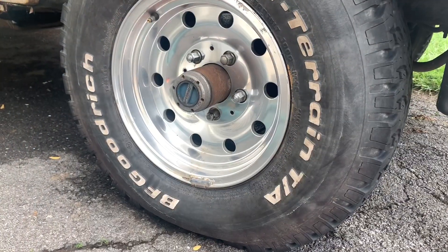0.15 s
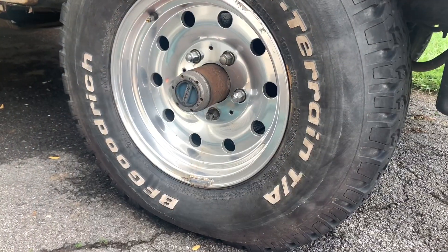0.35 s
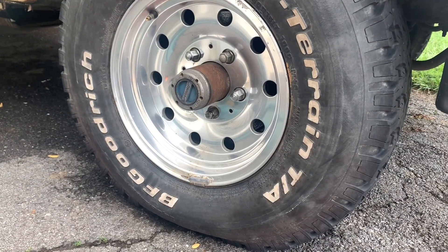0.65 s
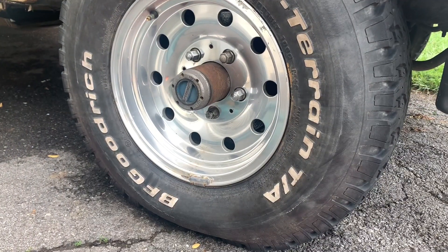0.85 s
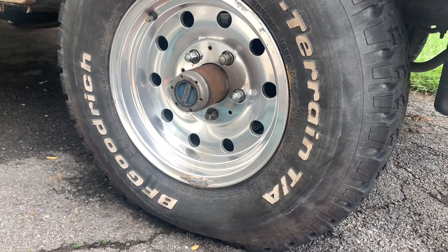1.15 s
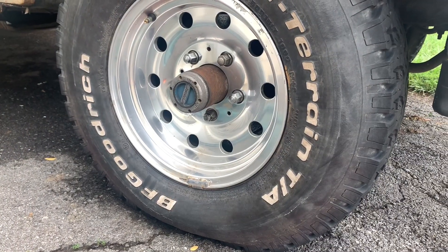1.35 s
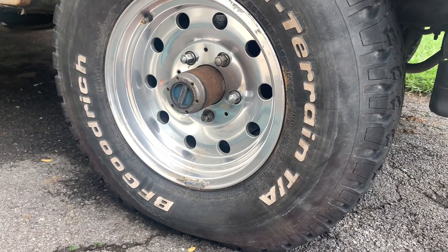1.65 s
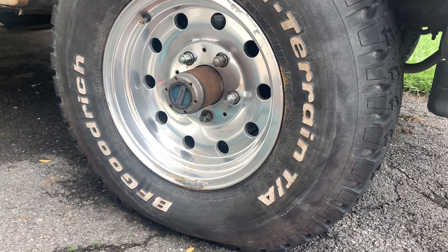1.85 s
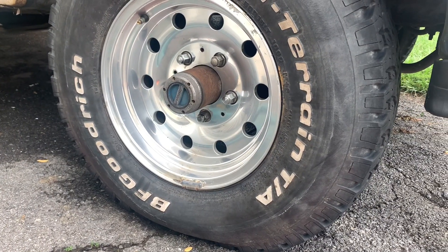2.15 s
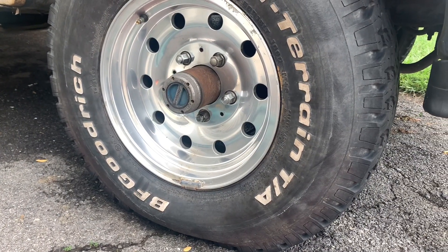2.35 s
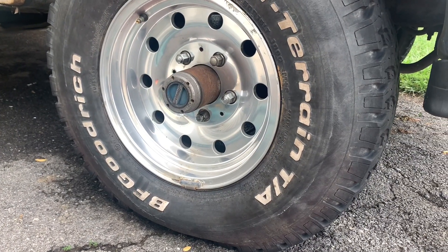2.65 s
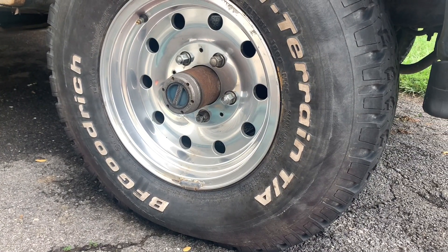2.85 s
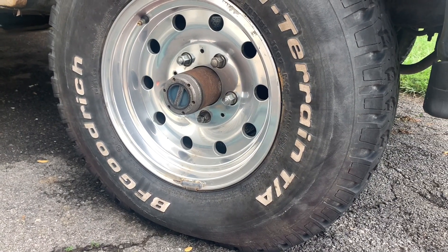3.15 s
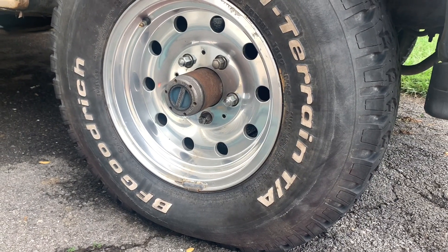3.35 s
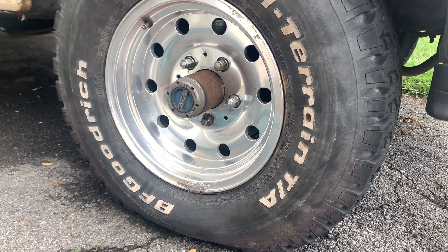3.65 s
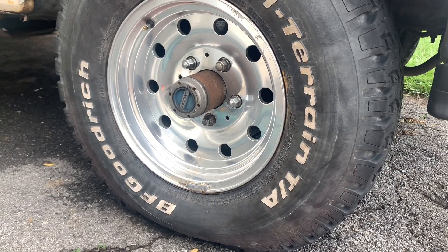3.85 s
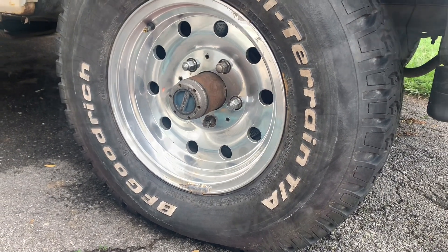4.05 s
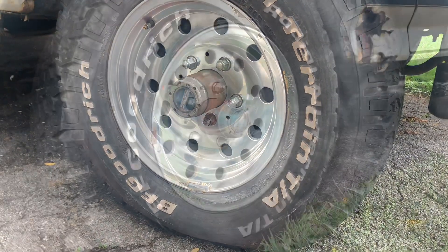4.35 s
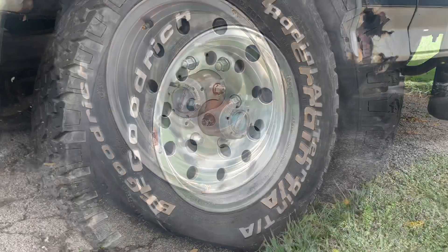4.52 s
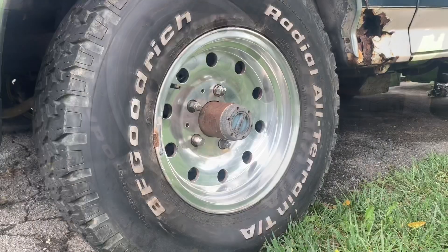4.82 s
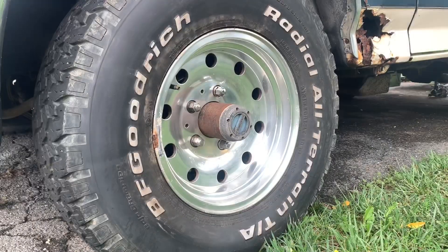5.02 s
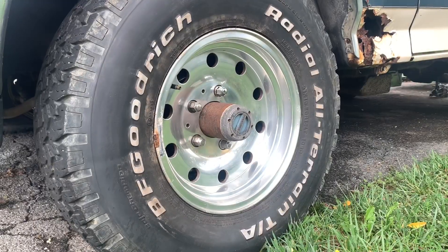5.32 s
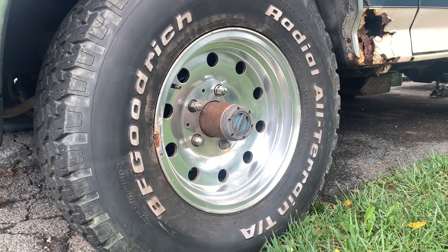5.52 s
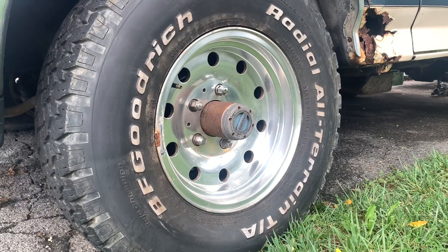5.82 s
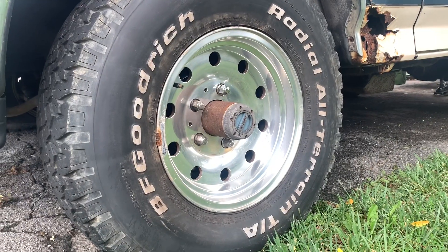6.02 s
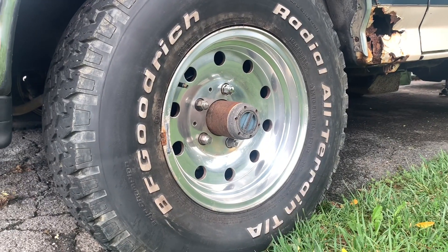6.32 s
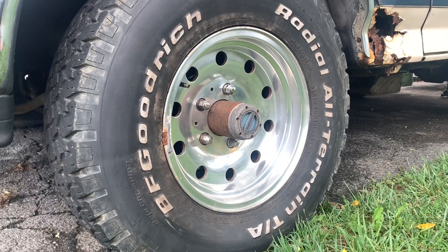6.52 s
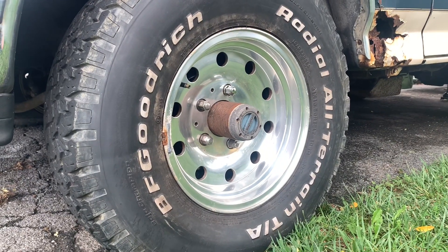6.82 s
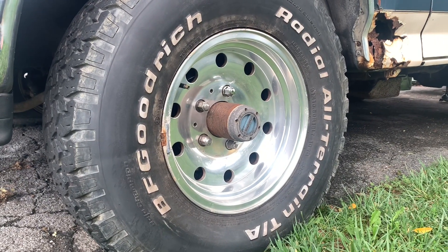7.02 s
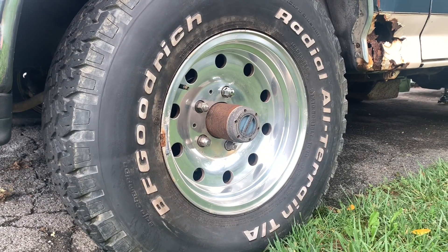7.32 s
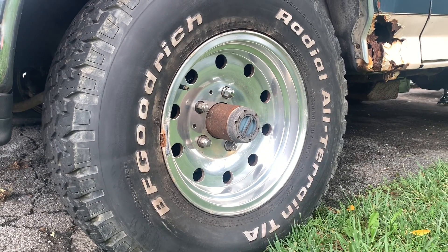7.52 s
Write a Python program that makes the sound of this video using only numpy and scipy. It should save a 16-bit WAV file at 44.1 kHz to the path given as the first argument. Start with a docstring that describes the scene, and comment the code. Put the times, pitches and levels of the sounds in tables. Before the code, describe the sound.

Close stereo microphone in a driveway: air rushes from a truck tire valve, its shrill whistle wavering at first, then settling slightly lower and holding steady with bright overtones. Around four seconds it slips and fades across into a second tire's wider, mostly toneless hiss, briefly tinged by a breathy tone. Faint low traffic rumble and small handling knocks sit underneath.

```python
"""A driveway, close to the valve stems of two truck tires: air hisses out of the first, then the second.
The first jet is shaped noise; its whistle is a stack of partials that lock to the stem as the flow settles.
The second is a wide rush of noise with a breathy, fading tone made of two narrow noise bands.
Low outdoor rumble is filtered noise, joined by a distant machine's hum beside the second tire.
Soft knocks on the hand-held stereo microphone are short sine pops with a tick of noise."""
import sys
import numpy as np
from scipy import signal
from scipy.fft import rfft, irfft
from scipy.io import wavfile

SR = 44100
rng = np.random.default_rng(int(sys.argv[2]) if len(sys.argv) > 2 else 0)


def unload_audio(sound):
    """Save the sound as a 16-bit wav file, at the path given as the first command line argument."""
    columns = np.transpose(np.atleast_2d(sound))
    # keep every value between -1 and 1, then stretch to whole-number steps
    steps = np.round(np.clip(columns, -1, 1) * 32767)
    wavfile.write(sys.argv[1], SR, steps.astype(np.int16))


N = 338461
EDGE_HZ = 15750  # upper edge of the recorder's band
TIME = np.arange(N) / SR
BINS = np.fft.rfftfreq(N, 1 / SR)

# Stem resonances that the partials glide through and the first jet also blows.
# Each row: centre in Hz, width in Hz, boost of a partial in dB,
# breath in dB before the whistle settles, breath in dB after.
STEM = [(4680, 33, 7.5, -41.5, -60), (6790, 127, 10, -42.5, -62), (8880, 113, 8, -43, -37),
        (10970, 450, 0, -60, -44)]
# How loosely the whistle is locked to the stem; it catches, stumbles, holds, then slips.
# Each row: time in seconds, looseness from 0 to 1.
LOOSENESS = [(.37, 1), (.41, 0.43), (.48, .45), (.51, 0.83), (.55, 0.32), (.62, 0.4), (.72, 0.27),
             (.86, 0.16), (1.05, 0.16), (1.3, 0.1), (1.6, 0), (3.75, 0.02), (4.05, 0.17), (4.1, 0.67),
             (4.18, 0.38), (4.4, 0.92)]
# The first jet's stereo image below the treble.
# Each row: frequency in Hz, radians by which left leads, coherence from 0 to 1, left-right in dB.
FIRST_PORTS = [(600, -1, 0.97, -0.5), (1000, 1.15, 0.7, 1), (1600, -0.05, 0.87, 0.5), (2220, 2.5, 0.47, -5),
               (2420, 3.5, 1, -4), (2927, 3, 1, -1.5), (3004, -1, 0.47, 2), (3900, 0.3, 0.33, -1),
               (4600, -1, 0.49, -5), (4870, -3.5, 0.73, -5.5), (5500, -4, 0.38, -3.5), (5760, -4.5, .1, -2),
               (5900, -6, 0.72, -4), (6700, -5, 0.39, -2), (7270, -7.8, 0.58, -1)]


def gain_of(db):
    """Decibels to amplitude."""
    return 10 ** (np.asarray(db) / 20)


def evened(x):
    """Scales to rms 1."""
    return x / np.sqrt(np.mean(np.abs(x) ** 2) + 1e-30)


def curves(rows):
    """Each column of a timed table, sample by sample."""
    s, *columns = np.transpose(rows)
    return [np.interp(TIME, s, column) for column in columns]


def spectra(rows):
    """Each column of a frequency table, bin by bin along a log frequency scale."""
    hz, *columns = np.transpose(rows)
    return [np.interp(np.log(BINS + 1), np.log(hz), column) for column in columns]


def bumps(rows, hz):
    """The dB that a set of peaks and dips gives at these frequencies."""
    return sum(db / (1 + ((hz - centre) / width) ** 2) for centre, width, db in rows)


def ramp(start_s, end_s):
    """Rises evenly from 0 to 1 between two times."""
    return np.clip((TIME - start_s) / (end_s - start_s), 0, 1)


def blend(a, b, share):
    """Equal-power passage from one sound to another."""
    return np.sqrt(1 - share) * a + np.sqrt(share) * b


def white():
    """A spectrum of white noise."""
    return rfft(rng.standard_normal(N))


def wander(rate_hz):
    """Random drift of rms 1, up to about the given rate."""
    return evened(irfft(white() / np.sqrt(1 + (BINS / rate_hz) ** 4), N))


def fuzz(width_hz):
    """The complex envelope of a narrow band of noise."""
    return evened(wander(width_hz) + 1j * wander(width_hz))


def carrier(hz):
    """A steady complex tone."""
    return np.exp(2j * np.pi * hz * TIME)


def at_ports(tone, balance_db, lead):
    """A complex tone as the two microphone ports hear it, tilted in level and in phase."""
    tilt = gain_of(balance_db / 2) * np.exp(.5j * lead)
    return np.array([tone * tilt, tone / tilt]).real * np.sqrt(2)


def noise_pair(colour_db, lead, coherence, balance_db):
    """Coloured noise of rms 1, partly shared by the two ports."""
    same, left = np.clip(coherence, 0, 1), white()
    shared = same * left * np.exp(-1j * lead)
    right = shared + np.sqrt(1 - same ** 2) * white()
    tilt = gain_of(balance_db / 2)
    pair = np.array([left * tilt, right / tilt])
    return evened(irfft(pair * gain_of(colour_db), N))


def stereo_image(rows):
    """Stereo phase, coherence and balance, bin by bin; one shared stereo image for the treble."""
    # Each row: frequency in Hz, radians by which left leads, coherence from 0 to 1, left-right in dB.
    treble_image = [(7450, -1.5, 0.67, 0), (8073, -3, 1, 0), (8885, -3, 1, 0), (9810, -5, 0.49, 0),
                    (10280, -6, 0.81, 0), (11700, -6, 0.92, 0), (12150, -7.7, .55, 0),
                    (12980, -9.4, .99, 0), (14100, -9.4, .98, 0), (14680, -11, .55, 0),
                    (15300, -12.5, 0.89, 0)]
    return np.where(BINS < treble_image[0][0], spectra(rows), spectra(treble_image))


def outdoors(first_db, second_db, wide_db, hum_db):
    """Far traffic as low noise, stronger beside the second tire, where a wavering hum joins it."""
    # Rumble before trim. Each row: time in seconds, level in dB.
    rumble_level = [(0, -52.5), (1.4, -49), (2.5, -54), (4.1, -56.5), (4.9, -48), (6.9, -48.5),
                    (7.67, -47.5)]
    # Rumble colour at each tire. Each row: frequency in Hz, relative density in dB per Hz.
    first_rumble = [(22, -12), (32, -23), (44, -4.5), (58, 0), (80, 0), (110, 1.5), (135, -2.5),
                    (165, -14.5), (200, -13.5), (260, -19.5), (350, -31.5), (560, -42), (760, -32),
                    (1000, -43), (1500, -54)]
    second_rumble = [(22, -28), (32, -26), (46, -3), (56, 1.5), (78, -4.5), (115, -0.5), (150, -6.5),
                     (200, -13.5), (310, -23.5), (360, -30), (490, -31), (600, -66), (1500, -67)]
    # The late spread between the ports.
    # Each row: frequency in Hz, radians by which left leads, coherence from 0 to 1, left-right in dB.
    wide_ports = [(50, .1, .99, 1), (100, 0.32, 1, 2), (160, 0.68, 0.81, 1), (220, 3.1, 1, 0),
                  (290, 2.8, 0.92, -1), (450, .3, 0.63, 0)]
    # A distant machine. Each row: frequency in Hz, level in dB before trim,
    # radians by which left leads once the rumble has spread.
    hum_rows = [(54.4, -56, .1), (103, -57, 0.54), (202.7, -66.5, 2.65), (303, -74.5, 3.1)]

    moved, spread = ramp(4.1, 4.9), ramp(5.7, 6.2)
    first = noise_pair(*spectra(first_rumble), lead=-0.079, coherence=0.97, balance_db=0.36)
    second = noise_pair(*spectra(second_rumble), lead=0, coherence=1.0, balance_db=.2)
    wide = noise_pair(*spectra(second_rumble), *spectra(wide_ports))
    beside_second = blend(gain_of(second_db) * second, gain_of(wide_db) * wide, spread)
    rumble = blend(gain_of(first_db) * first, beside_second, moved) * gain_of(curves(rumble_level)[0])

    hum = np.zeros((2, N))
    for hz, db, lead in hum_rows:
        waver = np.exp(0.99j * wander(1.7))  # slow drift of phase
        hum += at_ports(gain_of(db) * carrier(hz) * waver, 0, lead * spread)
    return rumble + gain_of(hum_db) * moved * hum


def flutter(x, depth_db, rate_hz, count=7):
    """Eddies make neighbouring bands of a jet swell and sag on their own."""
    place, spectrum = BINS / EDGE_HZ * (count - 1), rfft(x)
    out = np.zeros_like(x)
    for k in range(count):
        band = irfft(spectrum * np.maximum(1 - abs(place - k), 0), N)  # overlapping triangles
        out += band * gain_of(depth_db * wander(rate_hz))
    return evened(out)


def jet(flow, colour_db, image, level_db, flutter_db, surge_db):
    """Turbulent air leaving a valve stem: coloured noise with fluttering bands and slow surges."""
    hiss = flutter(noise_pair(colour_db, *image), flutter_db, rate_hz=14.0)
    return hiss * gain_of(level_db + curves(flow)[0] + surge_db * wander(3.9))


def first_jet():
    """The first valve's hiss, with uneven peaks and dips across its band."""
    # Hiss before trim. Each row: time in seconds, level in dB.
    flow = [(0, -28.5), (0.4, -26.5), (1, -25.5), (1.5, -24), (2.1, -26), (3.9, -27)]
    # Jet colour. Each row: frequency in Hz, relative density in dB per Hz.
    colour = [(450, -100), (900, -95.5), (1400, -87), (1750, -89), (2080, -69), (2300, -66.5), (2480, -111),
              (2800, -80), (4300, -76.5), (5700, -77), (6200, -69.5), (7700, -65.5), (10000, -69),
              (11200, -65), (12800, -68), (14200, -68), (15200, -63), (15700, -66)]
    # Peaks and dips. Each row: centre in Hz, width in Hz, peak or dip in dB.
    ripple = [(3196, 47, -9), (3490, 104, -8), (3990, 51, -4.5), (4980, 90, -3.5), (5320, 120, 2),
              (5680, 80, -2.5), (7000, 90, -11), (9530, 130, 3), (9900, 83, -1), (10600, 99, -2.5),
              (11400, 130, 4), (11630, 100, -3.5), (12330, 115, 7), (14270, 110, -6)]
    colour_db = spectra(colour)[0] + bumps(ripple, BINS)
    image = stereo_image(FIRST_PORTS)
    return jet(flow, colour_db, image, level_db=-1.0, flutter_db=0.86, surge_db=0.25)


def unsettled():
    """Looseness of the first jet's lock, ramped away as it settles on the stem's resonance."""
    return curves(LOOSENESS)[0] * (1 - ramp(0.7, 1.1))


def stem_breath():
    """The first jet blows each stem resonance as a narrow band of noise."""
    out, early = np.zeros((2, N)), unsettled()
    lead, _, balance_db = stereo_image(FIRST_PORTS)
    for hz, width, _, early_db, late_db in STEM:
        level_db = late_db + (early_db - late_db) * early
        tone = gain_of(level_db) * fuzz(width) * carrier(hz)
        out += at_ports(tone, np.interp(hz, BINS, balance_db), np.interp(hz, BINS, lead))
    return out


def whistle(shimmer_db, loose_shimmer_db, halo_hz, halo_growth, halo_sag_hz):
    """Vortices at the valve mouth lock to the stem: the firmer the lock, the louder and steadier the tone."""
    # The first valve's pitch. Each row: time in seconds, fundamental in Hz.
    pitch_rows = [(0.0, 2315), (0.35, 2320), (0.43, 2285), (0.52, 2310), (0.58, 2270), (0.65, 2297),
                  (0.78, 2262), (0.95, 2214), (1.25, 2184), (1.5, 2174), (1.72, 2187), (1.9, 2161),
                  (2.06, 2152), (2.18, 2175), (2.53, 2163), (2.68, 2182), (2.78, 2172), (3.1, 2178),
                  (3.42, 2191), (3.9, 2185), (4.3, 2137)]
    # Overtones firm up, thin out, then drop as the lock slips. Each row: time in seconds, strength in dB.
    overtone_rows = [(.35, -5.5), (.7, -6), (1.05, -1), (1.5, 0), (3.35, 0), (3.95, -3), (4.06, -5),
                     (4.14, -14), (4.45, -16)]
    # Partials from the fundamental up. Each row: relative level in dB,
    # change in dB per second as the pressure falls.
    partials = [(-1.08, 0), (-6.5, -1), (-8.5, -3), (-9.5, -1), (-4.5, -2.5), (-9, -0.9), (-13, -0.3)]
    # The same partials at the drifting microphone. Each row: left-right in dB, its drift in dB per second,
    # radians by which left leads, its drift in radians per second.
    partial_ports = [(-3.6, -0.3, 0, 0), (-7, 1.6, -1.7, 0.36), (-2, .4, -0.2, -0.33), (0, 0, 2.4, 0.11),
                     (0, 0, 0, 0), (0, 0, 3.14, 0), (0, 0, 0, 0)]
    # As pitch and hand move, reflections turn the fundamental between the ports.
    # Each row: time in seconds, added radians by which left leads, lean to the left in dB.
    turn_rows = [(.3, 1.78, 0), (.85, 1.78, 3.5), (.94, 2.55, 3), (1.2, 2.85, .5), (1.5, 2.62, 0),
                 (1.72, 2.85, 0), (1.85, 2.5, 0), (2.15, 2.63, 0), (2.5, 2.48, -.5), (3.15, 2.85, 0),
                 (3.35, 3.17, .5), (4.1, 3, 0)]
    locked_db, loose_db = -23.5, -16.5  # level when locked, change when fully loose
    breath_locked, breath_loose = .011, .72  # breathy power share when locked, and what looseness adds
    overtone_breath = 1.0  # how fast looseness blurs each higher partial
    jitter_hz, sway_hz, loose_sway_hz = 7.2, 2.4, 11  # Hz rms: fast, slower, added when fully loose

    loose = np.clip(curves(LOOSENESS)[0], 0, 1)
    overtones_db, pitch = curves(overtone_rows)[0], curves(pitch_rows)[0]
    turn, lean_db = curves(turn_rows)
    hz = pitch + (sway_hz + loose_sway_hz * np.sqrt(loose)) * wander(19.8)
    angle = 2 * np.pi * np.cumsum(hz + jitter_hz * wander(84.0)) / SR
    sag = carrier(-halo_sag_hz)  # the noisy halo sits a little under the tone
    boosts = [row[:3] for row in STEM]

    out = np.zeros((2, N))
    for k, (strength, placing) in enumerate(zip(partials, partial_ports), 1):
        db, sag_db = strength
        balance_db, balance_drift, lead, lead_drift = placing
        # high partials lock less firmly
        breathy = breath_locked + breath_loose * loose ** 1.5
        breathy = breathy + (k - 1) * overtone_breath * loose + halo_growth * (k - 1) ** 2
        breathy = np.clip(breathy, 0, 1)
        halo = fuzz(halo_hz * np.sqrt(k)) * sag
        envelope = np.sqrt(1 - breathy) + np.sqrt(breathy) * halo
        level_db = db + sag_db * TIME + (k > 1) * overtones_db + bumps(boosts, k * hz)
        tone = gain_of(level_db) * envelope * np.exp(1j * k * angle)
        balance = balance_db + balance_drift * TIME + (k == 1) * lean_db
        out += at_ports(tone, balance, lead + lead_drift * TIME + (k == 1) * turn)
    shimmer = (shimmer_db + loose_shimmer_db * loose) * wander(29)
    return out * gain_of(locked_db + loose_db * loose + shimmer)


def knocks(tick_s, tick_hz):
    """Each knock is a brief scuff of contact and a dull pop of a few cycles that reaches one port first."""
    # Each row: start in seconds, pop level in dB, pitch in Hz, length in seconds,
    # lag of the right side in seconds, peak of the contact tick in dB.
    knock_rows = [(.1426, -53.5, 450, .005, -.0002, -58), (1.2772, -42, 570, .004, -.0002, -43),
                  (1.908, -52, 510, .0045, -.0002, -55), (2.6572, -51.5, 520, .0045, -.0002, -52),
                  (3.1593, -51, 520, .0042, -.0002, -46), (3.9498, -51, 470, .005, -.0002, -56),
                  (4.1998, -49.5, 520, .0065, -.0002, -58), (5.651, -30.5, 460, .006, .0025, -42),
                  (5.9278, -46, 680, .003, -.0002, -36.5)]
    out, t = np.zeros((2, N)), np.arange(SR // 10) / SR
    band = signal.butter(2, [tick_hz / 2, tick_hz * 2], "band", fs=SR, output="sos")
    for s, db, hz, length, lag, tick_db in knock_rows:
        scuff = (t / tick_s) ** 2 * np.exp(-t / tick_s) * rng.standard_normal(len(t))
        tick = signal.sosfilt(band, scuff)
        tick = tick / abs(tick).max()
        age = np.clip(t - np.maximum([[-lag], [lag]], 0), 0, length)  # one row for each port
        pop = np.sin(np.pi * age / length) * np.sin(2 * np.pi * hz * age)
        out[:, round(s * SR):][:, :len(t)] += gain_of(db) * pop + gain_of(tick_db) * tick
    return out


def second_jet():
    """The second valve's wide rush, with uneven peaks and dips across its band."""
    # Each row: time in seconds, level in dB.
    flow = [(4.9, -24.5), (6.7, -23.5), (7.67, -24)]
    # Jet colour. Each row: frequency in Hz, relative density in dB per Hz.
    colour = [(600, -94), (780, -89), (1000, -88), (1400, -84.5), (1600, -76), (2050, -72.5), (2700, -68),
              (3000, -74.5), (3400, -77), (3750, -73.5), (4700, -77.5), (5500, -71), (7700, -67.5),
              (9300, -63.5), (11200, -65), (13300, -61), (15500, -63.5)]
    # Peaks and dips. Each row: centre in Hz, width in Hz, peak or dip in dB.
    ripple = [(1420, 60, -5), (2180, 42, -11), (2380, 120, 1), (3550, 250, 1), (4020, 65, -14),
              (7720, 130, 3), (10000, 200, 4), (12420, 150, 3), (14320, 90, -6)]
    # Its stereo image below the treble.
    # Each row: frequency in Hz, radians by which left leads, coherence from 0 to 1, left-right in dB.
    second_ports = [(700, 0, 0.78, 0), (1470, 0.4, 0.73, .5), (1770, 1.7, 0.92, -3), (2160, 2.5, 0.79, 1.5),
                    (2890, 2, 0.79, 0), (2960, 3, 1, 1), (3550, 3, 1, 0.5), (3600, 3.5, 0.62, -2.5),
                    (4080, 3, 0.76, 0.5), (5160, 3.5, 0.58, -5.5), (5850, 3.5, 0.7, -3),
                    (5960, 1.5, .35, 1.5), (6730, 4.5, 0.71, 0), (7400, 4.3, .7, 0)]
    colour_db = spectra(colour)[0] + bumps(ripple, BINS)
    image = stereo_image(second_ports)
    return jet(flow, colour_db, image, level_db=0, flutter_db=1.04, surge_db=0.24)


def edge_tone(core_hz, core_width_hz, breath_hz, breath_width_hz):
    """The second stem resonates without locking: a narrow, unsteady core in a wider band of air noise."""
    # It nearly catches, then dissolves.
    # Each row: time in seconds, core in dB, breath in dB, radians by which left leads.
    tone_rows = [(4.7, -52, -42, 2.2), (5.1, -43, -40.5, 2.36), (5.55, -37.5, -40.5, 2.5),
                 (5.95, -39.5, -41, 2.23), (6.4, -50, -41.5, 1.8), (6.6, -56, -52, 1.8),
                 (7.67, -75, -70, 2)]
    core_db, breath_db, lead = curves(tone_rows)
    core = gain_of(core_db) * fuzz(core_width_hz) * carrier(core_hz)
    breath = gain_of(breath_db) * fuzz(breath_width_hz) * carrier(breath_hz)
    return at_ports(core + breath, balance_db=-1.0, lead=lead)


def crossfade(first, second, out_power, in_power):
    """The scene dissolves from the first valve to the second, with a dip between them."""
    fade_out, fade_in = 1 - ramp(3.76, 4.98), ramp(3.96, 5.02)
    return first * fade_out ** out_power + second * fade_in ** in_power


def scene():
    """Both valves and their surroundings."""
    surroundings = outdoors(first_db=-0.5, second_db=-0.5, wide_db=-2.0, hum_db=1.5)
    first = first_jet() + stem_breath()
    first += whistle(shimmer_db=0.36, loose_shimmer_db=1.0, halo_hz=56, halo_growth=0.0064, halo_sag_hz=20)
    handling = knocks(tick_s=0.00095, tick_hz=1110)
    second = second_jet()
    second += edge_tone(core_hz=2090, core_width_hz=25, breath_hz=2050, breath_width_hz=96)
    valves = crossfade(first, second, out_power=0.96, in_power=1.15)
    return valves + surroundings + handling


def record(dry):
    """The recorder's band limit, a steep low-pass filter."""
    low_pass = signal.firwin(511, EDGE_HZ, window=("kaiser", 9), fs=SR)
    return signal.oaconvolve(dry, low_pass[None], "same")


dry = scene()
out = record(dry)
unload_audio(out)
```